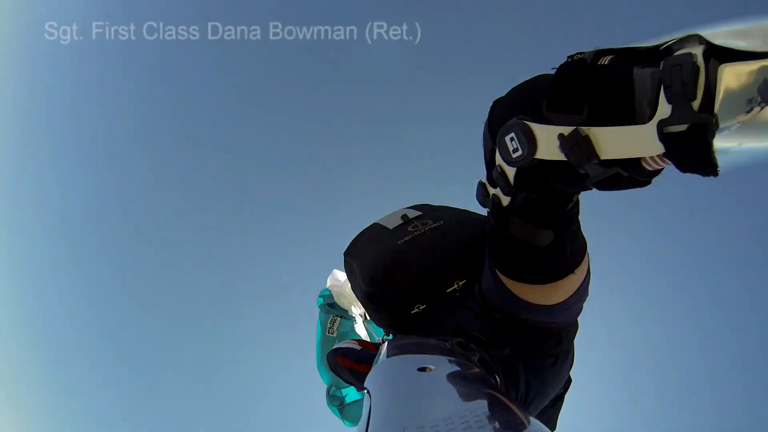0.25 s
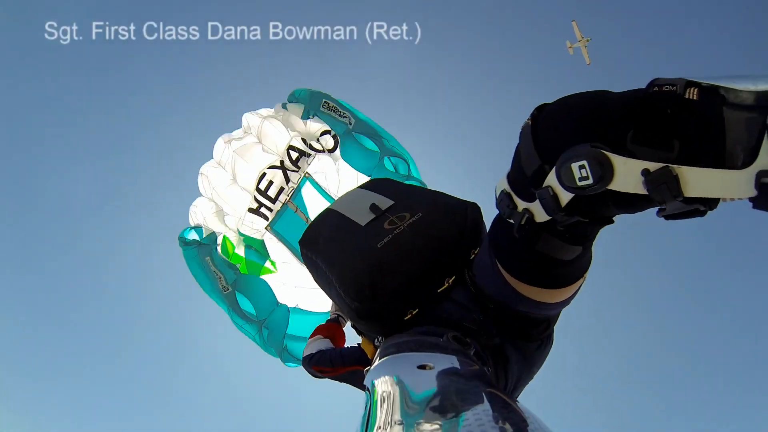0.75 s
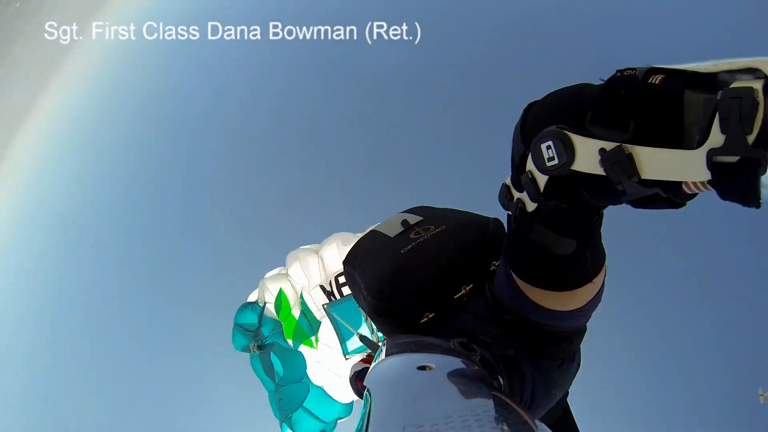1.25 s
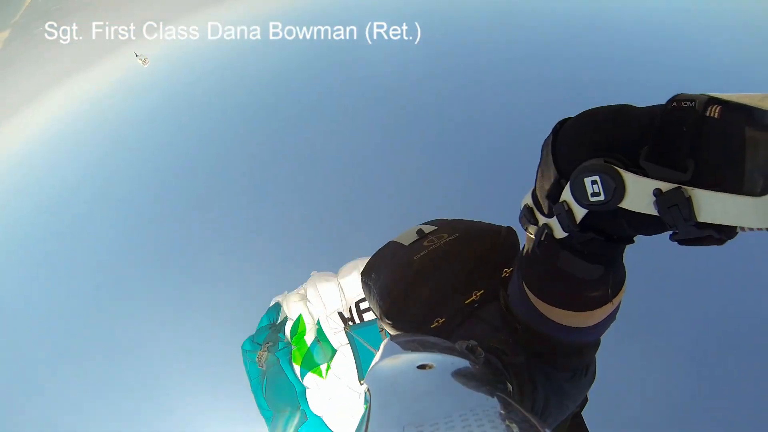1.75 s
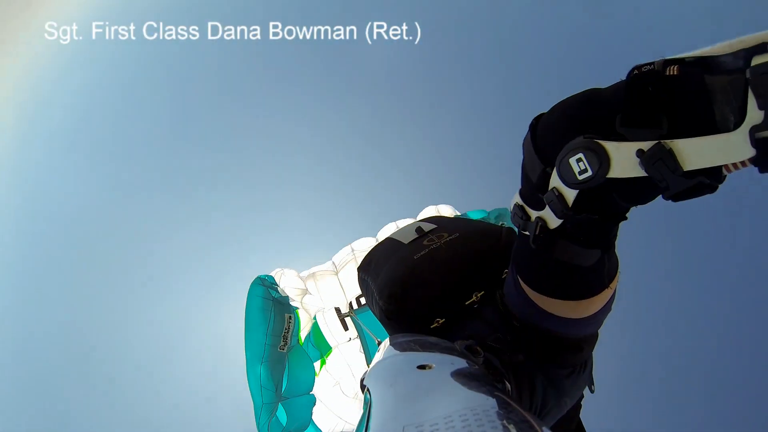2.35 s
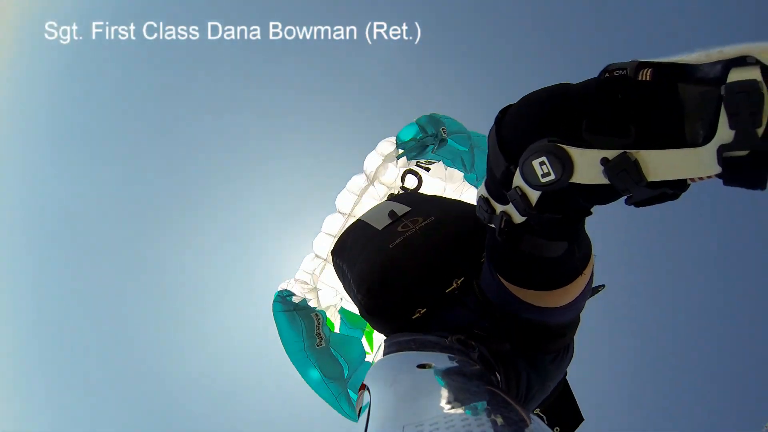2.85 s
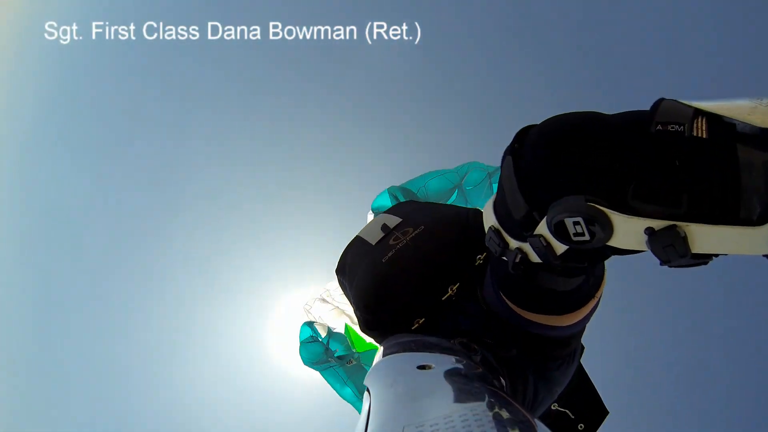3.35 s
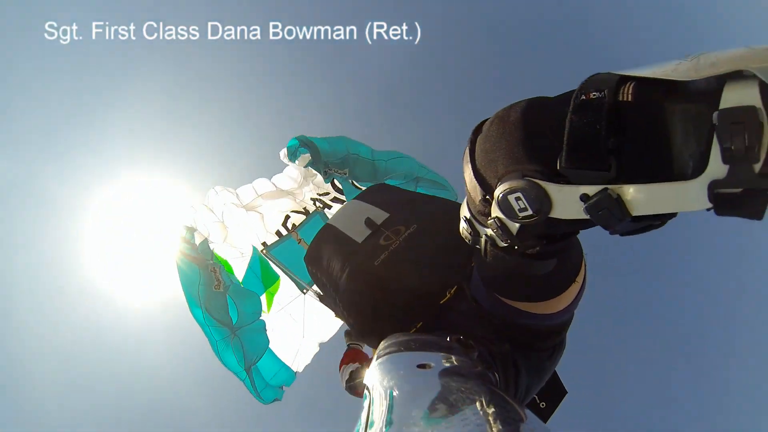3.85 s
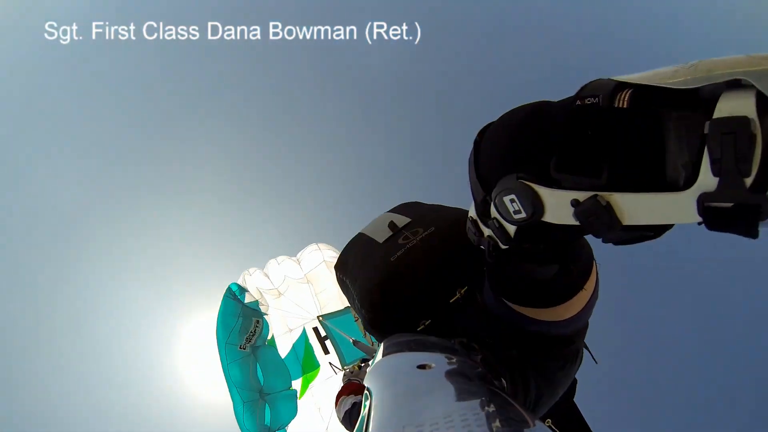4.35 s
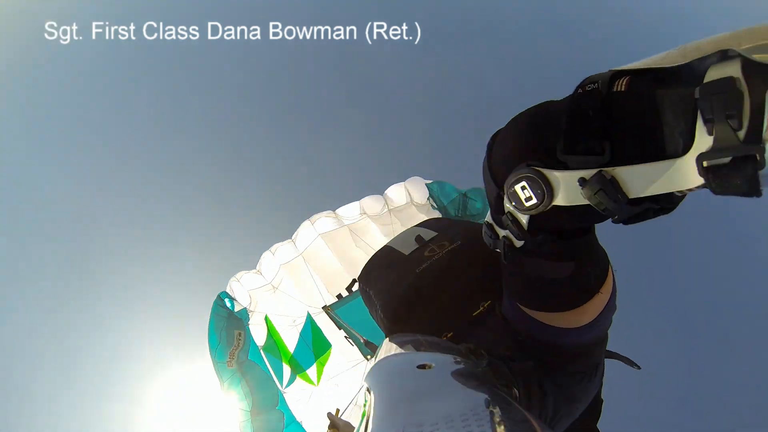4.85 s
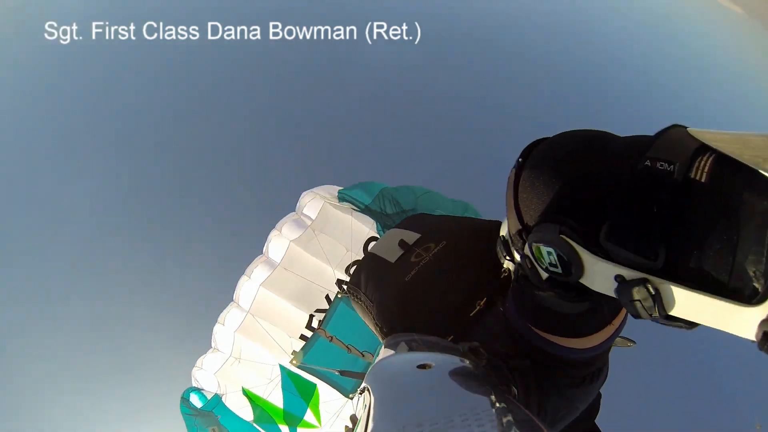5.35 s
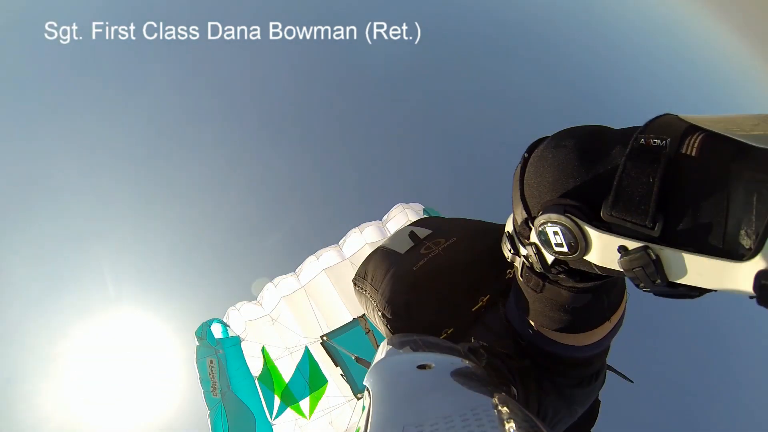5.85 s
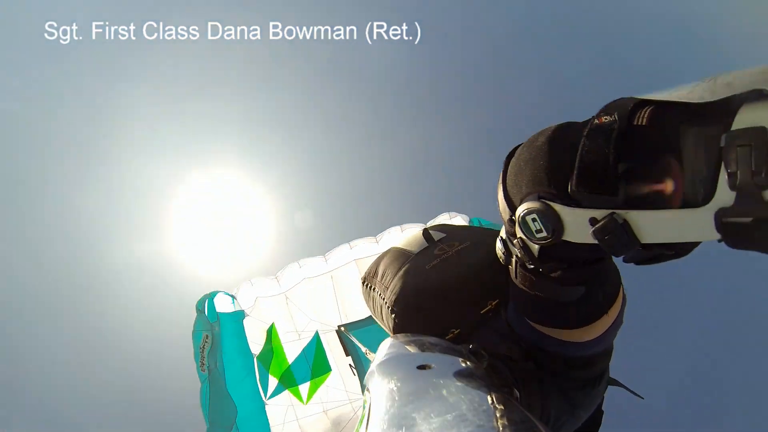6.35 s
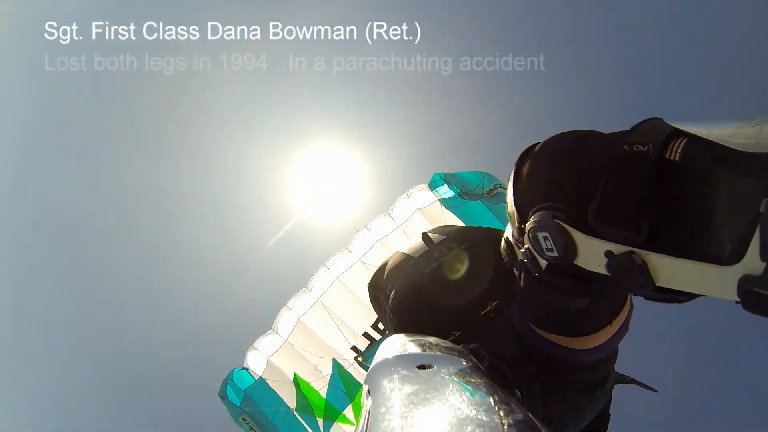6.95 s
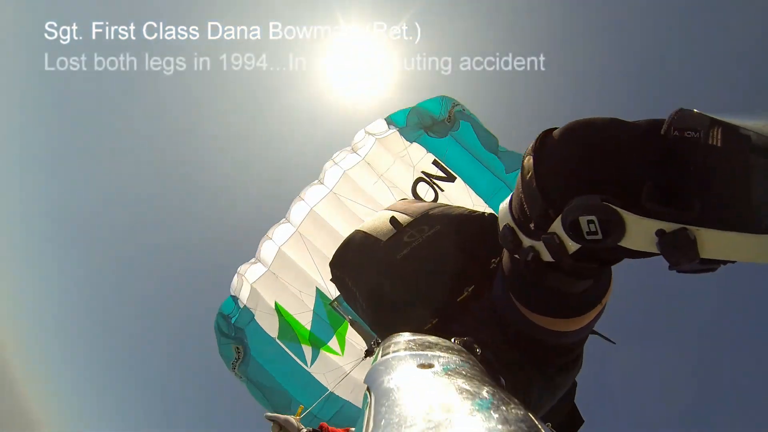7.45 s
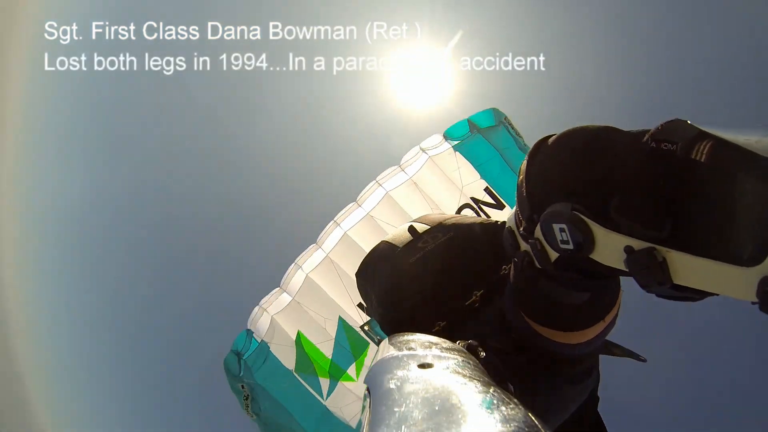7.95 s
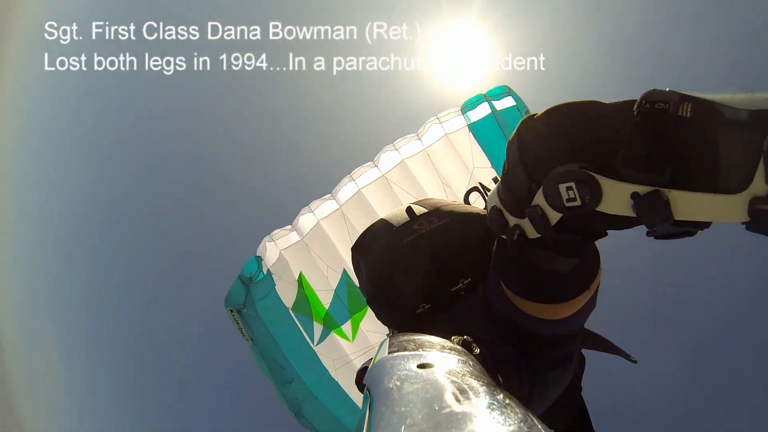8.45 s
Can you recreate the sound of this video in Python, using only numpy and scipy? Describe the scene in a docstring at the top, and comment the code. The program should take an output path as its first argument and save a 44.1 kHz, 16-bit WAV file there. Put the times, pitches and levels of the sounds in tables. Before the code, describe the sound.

Wind dominates throughout, very close and dry, shaking a body-worn microphone in open sky. At 0 s it is bright and hissing, with a fleeting thin, falling high whistle and a gust thump near 0.3. Small gear rattles tap at 0.7-0.85 over fluttering low thuds; a soft slap pair comes around 1.0-1.1. From about 1.25 the hiss drops and the roar fills out, with a hollow howl and a sharp tap at 1.43. A breathy, wavering whistle rises around 1.5-2.1. Hard pops and pressure slaps crowd 2.7-3.75, each briefly dipping the wind. A low howl swells near 4.1, then broad choppy rumble and airy howling continue through 5.5. After a pop at 5.9 and a faint whistle at 6.2, a dull tap at 6.6 leads into fast thudding and cracks near 6.85. Tiny ticks, pops at 7.4 and 7.6, and surging gusts carry on until an abrupt end around 8.7.

```python
"""Wind around a swinging skydiver

Wind buffets a camera strapped to a skydiver who swings under a canopy: noise bands stand for the eddy sizes,
from a heavy shake through roar and rush to hiss. Hollows howl and an edge whistles in breathy, wandering notes.
Hard gusts swing from suction to pressure and pop on the microphone port; rows of vortices thud.
Bursts of noise make the gear tap and the port tick, and the closed housing cuts off the top of the treble."""
import sys
import numpy as np
from scipy import signal
from scipy.fft import rfft, irfft
from scipy.io import wavfile
from scipy.ndimage import uniform_filter1d

SR = 44100
rng = np.random.default_rng(int(sys.argv[2]) if len(sys.argv) > 2 else 0)


def file_out(sig):
    """Save sig as 16-bit WAV at sys.argv[1]."""
    # one column per channel
    cols = np.atleast_2d(sig).T
    # limit, then scale
    lim = np.clip(cols, -1, 1)
    pcm = np.round(lim * 32767).astype(np.int16)
    wavfile.write(sys.argv[1], SR, pcm)


N = 384535

# Gusts that slap the microphone port. Each row: time in seconds, pressure in dB, length in seconds
# (each side fades over twice this), pop level in dB, strength in dB of the level dip after it
# (negative: a lift).
SLAP_EVENTS = [(0.298, -14, 0.0044, -54, 9), (0.985, -17, 0.0055, -55, 5), (1.092, -16.5, 0.0071, -58, 1.5),
               (2.107, -17, 0.008, -50, 2), (2.685, -23, .002, -32, -1), (2.698, -24, .0025, -34, 3.5),
               (2.706, -7, 0.0048, -34, 7), (2.807, -14, 0.0018, -37, 10.5),
               (2.839, -12.5, 0.0018, -36, 0.5), (2.867, -23, .002, -43, -0.5),
               (2.884, -16, 0.0027, -45, 6.5), (3.149, -3.5, 0.0012, -29, 9.5), (3.351, -15, 0.002, -37, 3),
               (3.53, -17, 0.0067, -48, 5), (3.578, -7.5, 0.0013, -32.5, 5), (3.675, -12, 0.0026, -38, 5),
               (3.746, -12, 0.0028, -36, 7.5), (5.898, -9.5, 0.0013, -37, -1.5),
               (6.585, -17, 0.0041, -50, 0), (6.855, -11.5, 0.002, -39, 5), (6.869, -14, 0.0022, -41, -3),
               (6.88, -6, 0.0011, -38, 3), (7.398, -14, 0.0016, -39, 3), (7.626, -12.5, .002, -36, 2.5)]
# Colour of the fine, airy hiss. Each row: frequency in Hz, strength in dB.
HISS_COLOUR = [(1500, -16.5), (2200, 11.5), (2700, 12.5), (3550, 17), (4200, 9.5), (5100, 6.5), (6000, -3),
               (7300, -8.5), (8550, -0.5), (9700, -8.5), (10600, -6), (12100, -17), (13200, -14),
               (15000, -24)]
# Colour of a pop at the port, also used for dull knocks. Each row: frequency in Hz, strength in dB.
POP_COLOUR = [(300, 2), (1000, 14.5), (2000, 7), (3000, 0), (4200, -9), (5500, -14.5), (7000, -18),
              (8600, -20.5), (12000, -36), (15000, -39)]


def from_db(db):
    """Turns decibels into a plain multiplier."""
    return 10 ** (np.asarray(db) / 20)


def rms_one(x):
    """Scales a signal to an average strength (rms) of 1."""
    return x / np.sqrt(np.mean(x ** 2) + 1e-20)


def drift(rate_hz):
    """Slow chance: noise through two equal low-pass steps, so it wanders smoothly; spread 1."""
    step = 40   # samples between the points that are computed
    settle = 2000   # points thrown away while the filter starts up
    r = np.exp(-2 * np.pi * rate_hz * step / SR)
    noise = rng.standard_normal(N // step + settle + 2)
    slow = signal.lfilter([1], [1, -2 * r, r * r], noise)[settle:]
    return np.interp(np.arange(N) / step, np.arange(len(slow)), rms_one(slow))


def coloured(x, spectrum):
    """Shapes x by a spectrum drawn over log frequency, falling away past its top; rms 1."""
    hz = np.maximum(np.fft.rfftfreq(N, 1 / SR), 1)
    points, db = np.transpose(spectrum)
    gain = from_db(np.interp(np.log(hz), np.log(points), db))
    gain = gain / np.maximum(hz / points[-1], 1) ** 2
    return rms_one(irfft(rfft(x) * gain, N))


def steady(x, span_s):
    """Holds the strength of a signal near 1 over spans longer than span_s; quicker changes remain."""
    return x / np.sqrt(uniform_filter1d(x ** 2, int(span_s * SR)) + 1e-12)


def bump(centre_s, half_s):
    """A smooth swell of height 1."""
    return np.exp(-np.minimum(((np.arange(N) / SR - centre_s) / half_s) ** 2, 50))


def swing(curve):
    """Each column of a level curve, sample by sample, in dB over its own average."""
    s, *columns = np.transpose(curve)
    levels_db = np.array([np.interp(np.arange(N) / SR, s, c) for c in columns])
    return levels_db - levels_db.mean(axis=1, keepdims=True)


def breathy_tone(hz, width_hz, waver_hz, flicker_db):
    """A note of rms 1 made from narrow noise, so it comes in shreds; its pitch and level wander."""
    phase = 2 * np.pi * np.cumsum(hz + waver_hz * drift(7.1)) / SR
    blur = signal.butter(2, width_hz / 2, fs=SR, output="sos")
    a, b = signal.sosfilt(blur, rng.standard_normal((2, N)))
    note = steady(a * np.cos(phase) + b * np.sin(phase), span_s=0.04)
    return rms_one(note * from_db(flicker_db * drift(16)))


def port_ticks():
    """Tiny ticks at the microphone port, at random and of uneven size, from start_s on."""
    start_s, rate_per_s, level_db, spread_db = 6.9, 14, -63.5, 4.5
    born = (rng.random(N) < rate_per_s / SR) & (np.arange(N) / SR > start_s)
    sizes = from_db(spread_db * np.minimum(rng.exponential(1, N), 2))
    fall = np.exp(-1 / (.0006 * SR))   # each tick dies over 0.6 ms
    ticks = signal.lfilter([1], [1, -fall], born * sizes + 1e-18)
    return from_db(level_db) * ticks * coloured(rng.standard_normal(N), HISS_COLOUR)


def taps():
    """Gear taps near the camera: short bright rattles with a thin ring, over a duller knock."""
    # Each row: time in seconds, level in dB, rise in seconds, time to fall by 60 dB in seconds,
    # top of its brightness in Hz, knock in dB against the rattle.
    tap_events = [(.682, -38, .001, .02, 14000, 0), (.712, -38.5, .0005, .015, 14000, 0),
                  (.756, -33.5, .002, .07, 14000, 3), (.806, -39, .002, .03, 12000, 4),
                  (.837, -41, .001, .025, 14000, -2), (1.429, -28, .0005, .016, 14000, -2),
                  (1.441, -45, .0005, .012, 14000, -2), (6.613, -41.5, .004, .045, 6600, 3)]
    # Colour of the rattle. Each row: frequency in Hz, strength in dB.
    tap_colour = [(600, -20), (1800, -9.5), (3000, 12.5), (4000, -4.5), (5200, -8), (7000, -19),
                  (8600, -14), (12000, -39.5), (15000, -32)]
    t, out = np.arange(N) / SR, np.zeros(N)
    rattle = steady(coloured(rng.standard_normal(N), tap_colour), span_s=0.0022)
    ring = breathy_tone(hz=3030, width_hz=200, waver_hz=20, flicker_db=0.5)
    rattle = rattle + from_db(-4) * ring
    knock = steady(coloured(rng.standard_normal(N), POP_COLOUR), span_s=0.003)
    for s, db, rise_s, t60_s, top_hz, knock_db in tap_events:
        rise = np.exp(np.clip((t - s) / rise_s, -20, 0))
        fall = from_db(-60 * np.clip((t - s) / t60_s, 0, 2))
        dull = signal.butter(5, top_hz, fs=SR, output="sos")
        out += from_db(db) * rise * fall * signal.sosfilt(dull, rattle + from_db(knock_db) * knock)
    return out


def whistle():
    """Air over an edge sings two notes in a spray of hiss; a fine gap sings far higher at the start."""
    # Each row: time of the loudest point in seconds, half length in seconds, level in dB,
    # level of the narrow note in dB against that.
    whistle_events = [(.1, 0.6, -47, -17), (1.79, 0.27, -43.4, -4.3), (6.232, 0.16, -50, -18)]
    t, edge = np.arange(N) / SR, np.zeros(N)
    broad = breathy_tone(hz=2934, width_hz=330, waver_hz=105.8, flicker_db=0.9)
    spray = coloured(rng.standard_normal(N), HISS_COLOUR)
    narrow = breathy_tone(hz=3290, width_hz=80, waver_hz=22, flicker_db=2.5)
    for s, half_s, db, narrow_db in whistle_events:
        facing = 1 / (1 + ((t - s) / half_s) ** 6)   # 1 when the edge meets the air squarely
        # the narrow note needs the squarest flow, so it fades sooner
        notes = broad + from_db(-15.5) * spray + from_db(narrow_db) * facing * narrow
        edge += from_db(db) * facing * notes
    # the thin note falls towards thin_end_hz while it dies away
    thin_end_hz, drop_hz, glide_s, thin_db, thin_length_s = 8340, 1430, 0.049, -53.5, 0.071
    thin_hz = thin_end_hz + drop_hz * np.exp(-t / glide_s)
    thin = breathy_tone(hz=thin_hz, width_hz=1100, waver_hz=59.6, flicker_db=0)
    return edge + from_db(thin_db) * bump(0, thin_length_s) * thin


def howls():
    """Air blowing across each hollow in the gear sounds a broad, wandering note that comes in surges."""
    # Each row: time of the loudest point in seconds, half length in seconds, pitch in Hz,
    # width of the note in Hz, level in dB.
    howl_events = [(0.77, 0.42, 2114, 520, -40.5), (1.345, 0.073, 638, 430, -24),
                   (1.72, 0.3, 750, 600, -28.7), (4.1, 0.18, 551.6, 320, -32), (5.38, 0.32, 1201, 900, -35),
                   (5.0, .7, 1958, 400, -43.5)]
    out = np.zeros(N)
    for s, half_s, hz, width_hz, db in howl_events:
        note = breathy_tone(hz=hz, width_hz=width_hz, waver_hz=.12 * hz, flicker_db=3.5)
        out += from_db(db) * bump(s, half_s) * note
    return out


def slaps():
    """Suction builds, then snaps over into pressure; the port pops at the turn with a short, ragged crack."""
    pop_rise_s, pop_fall_s = .0007, 0.0015
    t, out = np.arange(N) / SR, np.zeros(N)
    crack = steady(coloured(rng.standard_normal(N), POP_COLOUR), span_s=0.0014)
    for s, push_db, length_s, pop_db, _ in SLAP_EVENTS:
        near = slice(int((s - .2) * SR), int((s + .2) * SR))
        age = t[near] - s
        push = np.tanh(age / 0.00094) * np.exp(-np.abs(age) / (2 * length_s))
        pop_shape = np.exp(np.minimum(age / pop_rise_s, -age / pop_fall_s))
        out[near] += from_db(push_db) * push
        out[near] += from_db(pop_db) * crack[near] * pop_shape
    return out


def level_dips():
    """The level heard dips briefly after each slap and returns (a negative strength lifts it); in dB."""
    attack_s, recovery_s = 0.0053, 0.06
    t, dip_db = np.arange(N) / SR, np.zeros(N)
    for s, *_, strength_db in SLAP_EVENTS:
        age = np.clip(t - s, 0, 1)
        dip_db += strength_db * np.tanh(age / attack_s) ** 2 * np.exp(-age / recovery_s)
    return dip_db


def gusts():
    """Brief gusts lift or lower the wake, the roar and the rush; in dB."""
    # Each row: time in seconds, half length in seconds, lift of the wake in dB, of the roar in dB,
    # of the rush in dB.
    gust_events = [(0.006, 0.055, 2, 3, 0.5), (0.275, 0.033, 4.5, -2, -3.5), (0.56, 0.019, 6, 5, 4.5),
                   (0.667, 0.051, 4.5, 2.5, 7.5), (0.77, 0.035, 1, 4, 6), (0.87, .016, -2, -3, -5.5),
                   (0.928, 0.039, -0.5, 0, 4), (1.336, 0.065, -4, -2.5, 3), (1.72, 0.2, 0, 0.5, 1.5),
                   (2.02, 0.05, 1.5, 0, 0), (2.093, .015, 9, -2.5, 1.5), (2.17, 0.04, -1.5, -2, 1.5),
                   (2.393, 0.11, 1.5, 0, -2), (3.113, 0.062, 5, 1.5, 0.5), (3.516, 0.017, 1, 0, 4),
                   (3.57, 0.0067, 15, 12, 4), (3.732, 0.0083, 1, 7, 3.5), (3.82, 0.041, -4, -0.5, 1),
                   (4.05, 0.075, -5, 1.5, -1), (4.203, 0.023, 5.5, 0, 2), (4.253, .007, 1, 6, 1),
                   (4.543, 0.057, 1.5, 1, 1.5), (4.77, 0.025, -1, 3, -1), (4.876, 0.058, -2, 1, 1.1),
                   (5.168, .05, -0.5, -0.5, 1), (5.51, 0.03, -1, 4, 1.5), (5.784, 0.023, 5.5, 2, 2.5),
                   (6.006, .05, -2.5, -2, -1.2), (6.086, 0.029, 4.5, 1, 4), (6.3, 0.05, 1.5, 0, 3.5),
                   (6.535, .06, -2.5, -6.5, -0.5), (6.654, 0.025, 2.5, 2, 1.5), (6.7, .006, 1, 1, 3),
                   (6.797, 0.049, 0, -0.5, 2.5), (6.843, 0.0062, 2, 5.5, -1), (6.945, 0.014, 3, 2.5, 0.5),
                   (6.996, 0.013, 5.5, 2.5, 1.5), (7.063, 0.067, 1.5, 2, 3), (7.25, 0.0079, 2, 6.5, -3.5),
                   (7.355, 0.044, 0.5, 3.5, 1.5), (7.547, 0.095, -1.5, 2, 1.5), (8.14, 0.046, 0, 2, 5),
                   (8.502, 0.17, 0, 2, 5), (8.576, .035, 2, 0.5, 0.5)]
    shapes = np.array([bump(s, half_s) for s, half_s, *_ in gust_events])
    return np.array(gust_events)[:, 2:].T @ shapes


def shedding():
    """Vortices peel off the housing, each a sharp push between shallow suctions; also returns their sway."""
    # Each row: middle in seconds, half length in seconds, vortices per second at the middle before wavering,
    # slowing in octaves per second, level in dB.
    vortex_runs = [(0.804, 0.19, 87, 1.3, -27), (1.301, 0.19, 40, 1.8, -24.5), (2.822, 0.14, 54, 0.3, -27),
                   (3.784, 0.2, 44, 0.52, -28), (6.565, .03, 80, 4, -24), (6.815, 0.06, 190, 19, -20)]
    jitter_octaves, uneven_db = 0.24, 2.5   # the rate wavers and the vortices differ in strength
    t, out, sway = np.arange(N) / SR, np.zeros(N), np.zeros(N)
    waver = jitter_octaves * drift(17.37)
    strength = steady(from_db(uneven_db * drift(20)), span_s=0.23)
    for s, half_s, rate_hz, slowing, db in vortex_runs:
        octaves = waver - slowing * np.clip(t - s, -1, 1)
        turn = 2 * np.pi * np.cumsum(rate_hz * 2 ** octaves) / SR
        run = bump(s, half_s)
        pushes = rms_one(np.cos(turn) + .3 * np.cos(2 * turn))
        out += from_db(db) * run * strength * pushes
        sway += run
    return out, sway


def eddies(low_hz, high_hz, flutter_db, span_s, tilt_db=0):
    """Pressure from one range of eddy sizes; it swells with the flutter, and tilt favours the small ones."""
    # Colour of the turbulence. Each row: frequency in Hz, strength in dB.
    turbulence_colour = [(15, 6.5), (35, 0.5), (100, -1), (250, -4.5), (450, -9), (750, -13), (1020, -17.5),
                         (1280, -21), (1900, -21.5), (2500, -29.5), (3050, -33), (4000, -47), (5100, -60),
                         (7000, -64)]
    band = signal.butter(3, [low_hz, high_hz], "band", fs=SR, output="sos")
    pressure = signal.sosfilt(band, coloured(rng.standard_normal(N), turbulence_colour))
    middle_hz = np.sqrt(low_hz * high_hz)
    coarse = signal.sosfiltfilt(signal.butter(2, middle_hz, fs=SR, output="sos"), pressure)
    fine = pressure - coarse
    pressure = coarse / from_db(tilt_db) + fine * from_db(tilt_db)
    return steady(rms_one(pressure) * from_db(flutter_db), span_s)


def fine_hiss(lift_db):
    """The finest eddies: the higher the lift, the stronger the top octave of their hiss; rms near 1."""
    hiss = coloured(rng.standard_normal(N), HISS_COLOUR)
    top = signal.sosfiltfilt(signal.butter(4, 9500, "high", fs=SR, output="sos"), hiss)
    reach_db = np.clip(0.41 * (lift_db - 6.0), -4, 4)
    return hiss + (from_db(reach_db) - 1) * top


def wind():
    """Airflow drives roar, rush and hiss; big eddies shake the flow, so the finer ones flutter together."""
    # In these three curves only the changes around the average count.
    # Flow over the housing as it swings through the stream. Each row: time in seconds, rush level in dB.
    flow_curve = [(0.0, -30), (0.12, -40.5), (0.27, -32), (0.31, -34), (0.7, -38.5), (1.09, -38),
                  (1.8, -37), (2.35, -37), (2.6, -34), (2.69, -38), (2.72, -43.5), (3.42, -36), (3.71, -49),
                  (4.44, -32.5), (5.15, -37), (5.54, -36), (5.75, -36), (5.97, -47), (6.34, -37.5),
                  (6.48, -43), (7.31, -38.5), (7.72, -41.5), (8.6, -37.5), (8.72, -39)]
    # Bass. Each row: time in seconds, level of the slow heave in dB, level of the buffeting in dB.
    bass_curve = [(0.0, -36.5, -22), (0.3, -24.5, -27.5), (1.0, -30.5, -22.5), (1.35, -27.5, -27.5),
                  (1.65, -33, -27), (2.1, -25.5, -28.5), (2.25, -38, -36), (2.5, -36.5, -31.5),
                  (2.68, -25, -25), (3.0, -36.5, -26.5), (3.85, -24.5, -28), (4.05, -33.5, -37),
                  (4.3, -33.5, -29.5), (4.75, -36, -24.5), (5.2, -29.5, -25.5), (6.1, -39, -28.5),
                  (6.85, -26.5, -26.5), (7.3, -32.5, -26), (8.35, -38.5, -29.5), (8.6, -30, -27.5)]
    # Low rumble in the wake of the housing. Each row: time in seconds, level in dB.
    wake_curve = [(0.0, -27.5), (0.65, -30), (1.2, -29), (1.7, -27.5), (2.05, -27.5), (2.25, -33),
                  (2.55, -27), (3.5, -31), (3.92, -36), (4.25, -24), (5.55, -26.5), (5.8, -24.5),
                  (6.05, -31.5), (6.8, -21.5), (7.2, -26.5), (7.5, -22.5), (8.25, -27), (8.6, -24.5)]
    # Colour of the soft, airy hiss behind the gusts. Each row: frequency in Hz, strength in dB.
    air_colour = [(1500, -11), (3000, 12.5), (4200, -1), (5200, -7.5), (6300, -22.5), (9000, -19.5),
                  (14000, -42)]
    t = np.arange(N) / SR
    (flow,), (sway, bass), (rumble,) = swing(flow_curve), swing(bass_curve), swing(wake_curve)
    # the opening canopy brakes the fall: 1 in the fast air before it, 0 after
    brake_s, brake_length_s = 1.24, 0.03
    fast = .5 - .5 * np.tanh((t - brake_s) / (2 * brake_length_s))
    wake_gust, roar_gust, rush_gust = gusts()
    dip = level_dips()
    vortices, shed = shedding()
    calm_db = 1 * shed   # random buffeting gives way to the vortices

    # base levels in dB, each with its own changes; the roar is fullest when buffeting is weak
    heave_db = -31 + sway - calm_db
    buffet_db = -28 + bass + 0.54 * wake_gust - 0.49 * dip - calm_db
    wake_db = -27 + rumble + wake_gust - 0.76 * dip - .5 * calm_db
    roar_db = -28.5 + 0.75 * flow + 0.42 * rumble - 0.3 * bass
    roar_db = roar_db - 3.5 * fast + roar_gust - 0.85 * dip   # fast air roars less
    rush_db = -38 + flow + rush_gust - 1.0 * dip
    # fast air hisses more, by an extra that wanes as the canopy fills; all the hiss fades slowly (dB per s)
    hiss_lift_db = 0.68 * flow + (11 - 3 * t) * fast - 1.17 * t
    hiss_lift_db = hiss_lift_db + 0.63 * rush_gust - 0.89 * dip
    air_db = -59.5 - 0.27 * bass + .3 * rumble - .15 * flow - 1.4 * dip

    # energy cascades from size to size: the wake leans towards its stronger neighbour,
    # and faster air brightens roar and rush
    wake_tilt_db = np.clip(.55 * (roar_db - buffet_db) - .3, -7, 1.4)
    roar_tilt_db = 1.1 + 0.23 * flow + 0.48 * bass - 0.2 * rumble
    rush_tilt_db = 0.29 * (hiss_lift_db - hiss_lift_db.mean())

    swirl = eddies(low_hz=54.7, high_hz=126.5, flutter_db=3.1 * drift(24), span_s=.09)
    flutter = rms_one(.5 * swirl + 0.63 * drift(29) + .5 * drift(240))
    flutter = flutter * from_db(0.16 * rumble)   # a strong wake makes it choppier
    roar_flutter_db = 0.72 * flutter + 0.25 * drift(7.4)

    heave = from_db(heave_db) * eddies(low_hz=27.2, high_hz=54.0, flutter_db=0, span_s=0.39)
    buffet = from_db(buffet_db) * swirl
    wake = from_db(wake_db) * eddies(
        low_hz=132.0, high_hz=391, flutter_db=1.3 * flutter, span_s=.13, tilt_db=wake_tilt_db)
    roar = from_db(roar_db) * eddies(
        low_hz=385, high_hz=1245, flutter_db=roar_flutter_db, span_s=0.21, tilt_db=roar_tilt_db)
    rush = from_db(rush_db) * eddies(
        low_hz=1160, high_hz=7200, flutter_db=1.2 * flutter, span_s=0.14, tilt_db=rush_tilt_db)
    hiss = from_db(-57.5 + hiss_lift_db + 1.3 * flutter) * fine_hiss(hiss_lift_db)
    air = from_db(air_db) * coloured(rng.standard_normal(N), air_colour)
    return vortices + heave + buffet + wake + roar + rush + hiss + air


def scene():
    """Adds all the sources into one channel."""
    return (port_ticks() + taps() + whistle() + howls() + slaps() + wind())[None]


def record(dry):
    """The strongest swings are rounded off, the ends fade within 2 ms and the housing cuts the top."""
    ceiling, cutoff_hz = 0.39, 15200
    rounded = dry / (1 + (dry / ceiling) ** 8) ** (1 / 8)
    fade = signal.windows.tukey(N, .004 * SR / N)   # the share covers both ends together
    muffle = signal.ellip(10, .1, 80, cutoff_hz, fs=SR, output="sos")
    return signal.sosfilt(muffle, rounded * fade)


dry = scene()
out = record(dry)
file_out(out)
```